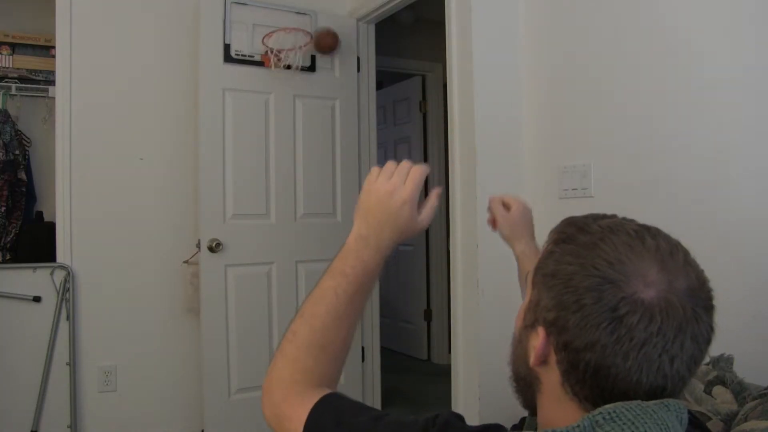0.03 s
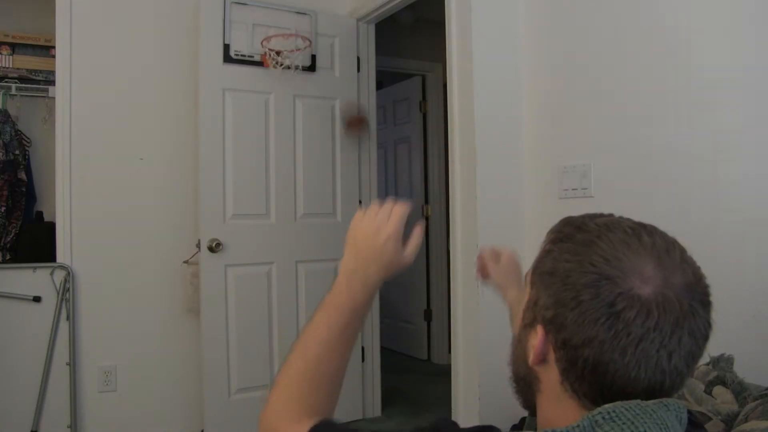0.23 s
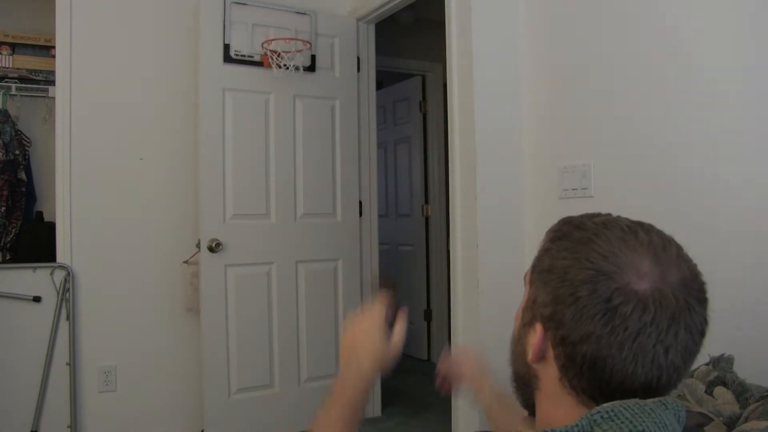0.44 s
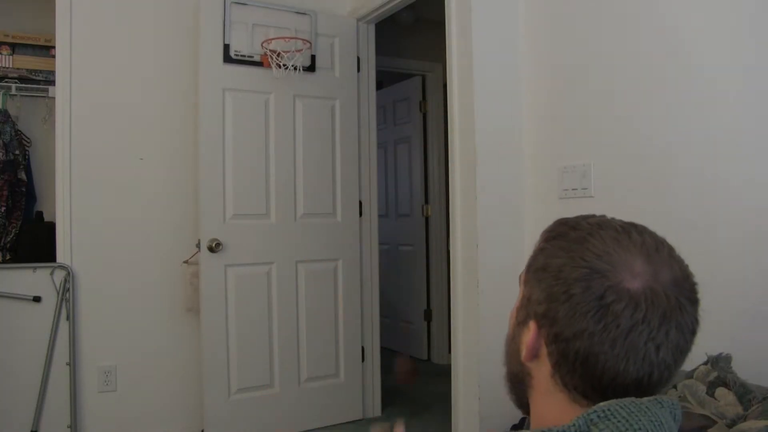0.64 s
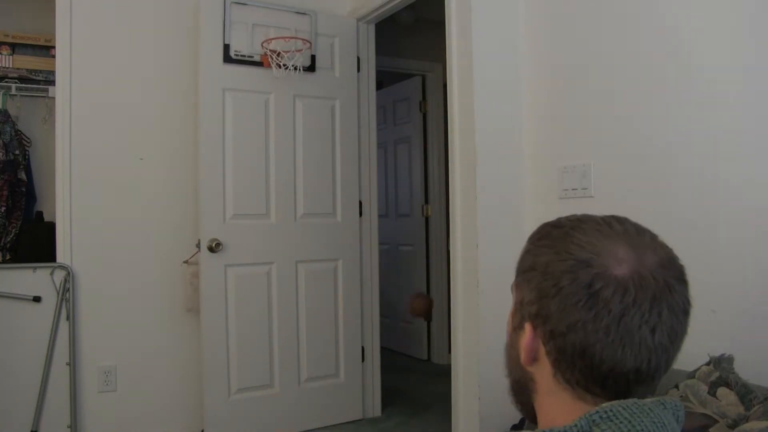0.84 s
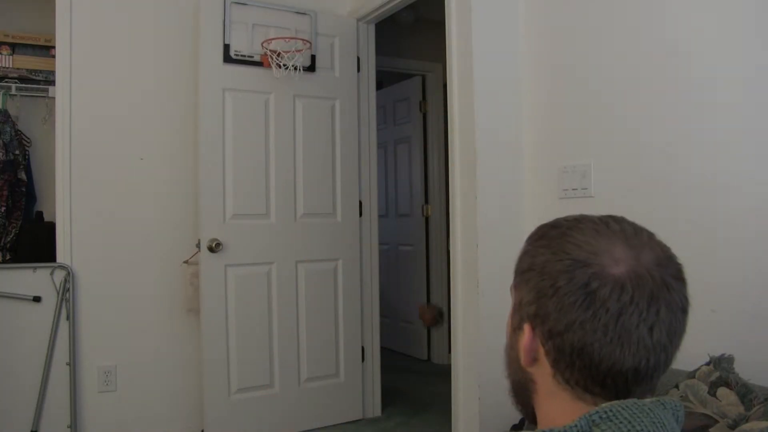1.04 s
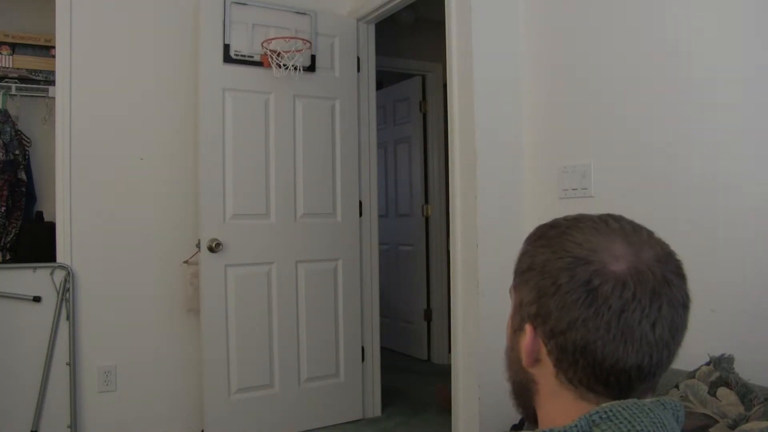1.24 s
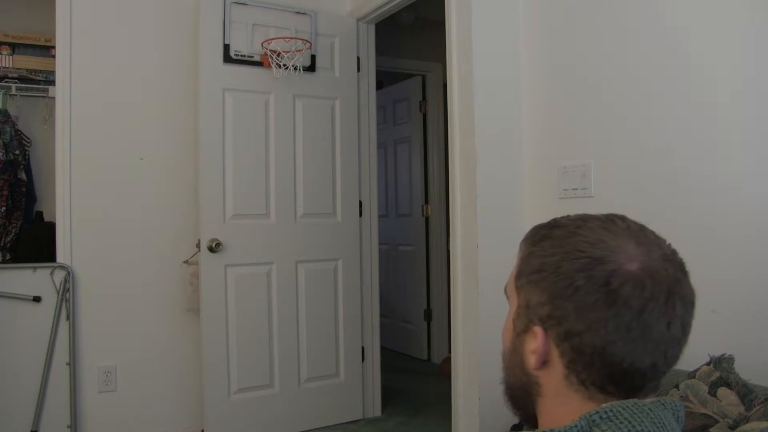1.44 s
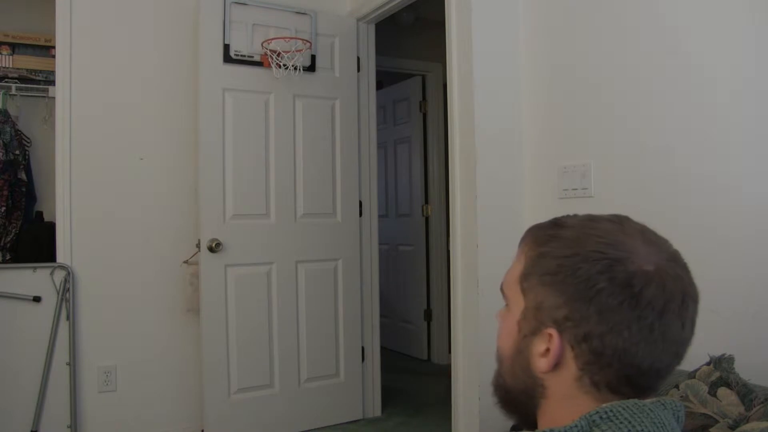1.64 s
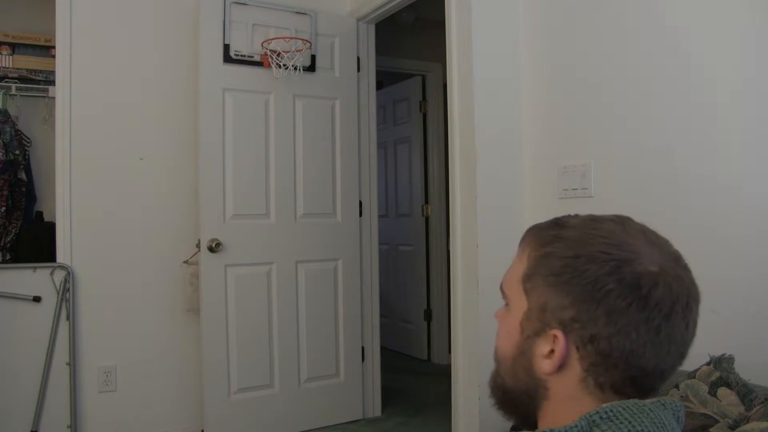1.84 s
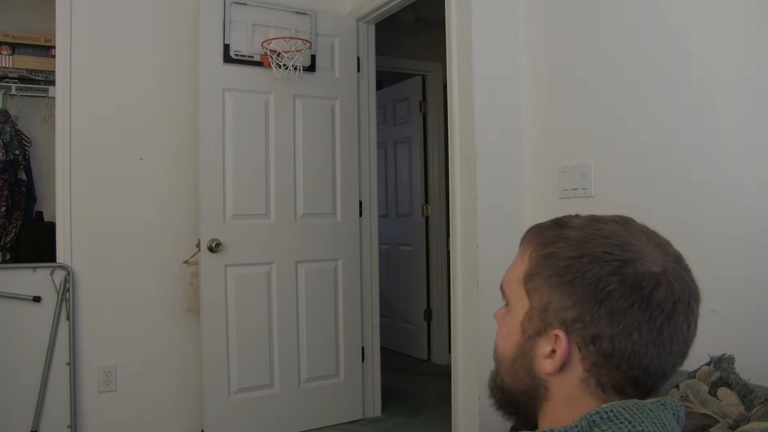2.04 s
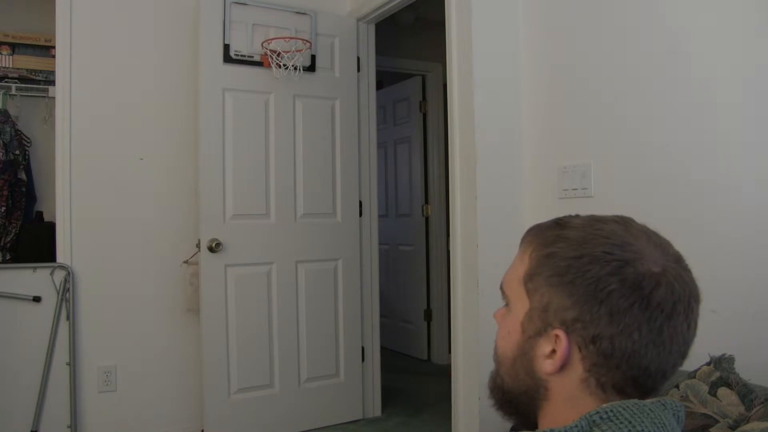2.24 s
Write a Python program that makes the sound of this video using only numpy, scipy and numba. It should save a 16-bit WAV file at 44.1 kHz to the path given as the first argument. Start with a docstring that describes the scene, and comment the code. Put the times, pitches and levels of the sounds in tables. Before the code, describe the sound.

Loud plastic clatter of a toy hoop and door opens at once and dies quickly, followed by a hollow knock, two weakening floor thumps and a slight clothing rustle, picked up in stereo in a small room with low hiss and hum.

```python
"""A plastic backboard hung over a hollow door is struck by a small ball: modal resonators under short blows.
Board and hoop rattle as random clicks, the board slaps the door (modal) and its hooks squeak (harmonic partials).
The ball then knocks a hollow panel and bounces on a carpeted floor, softer each time, both modal with noise scuffs.
Shaped noise gives rustling clothes and microphone hiss, sines the mains hum; all-pass filters and a feedback
delay network give the small furnished room."""
import sys
import numpy as np
from scipy import signal
from scipy.fft import rfft, irfft, next_fast_len
from scipy.io import wavfile
from scipy.ndimage import uniform_filter1d
from numba import njit

SR = 44100
rng = np.random.default_rng(int(sys.argv[2]) if len(sys.argv) > 2 else 0)


def persist_wave(psi):
    """Save psi, clipped to +-1, as 16-bit WAV."""
    counts = np.round(np.clip(psi, -1, 1) * 32767).astype(np.int16)
    wavfile.write(sys.argv[1], SR, np.atleast_2d(counts).T)


N = 100239

LEAD = int(.05 * SR)  # samples computed before time 0 and then dropped; negative times fall here
M = N + LEAD
T = np.arange(M) / SR - .05  # s
TOP_HZ = 15900  # upper band limit


def undb(db):
    """Decibel definition: amplitude ratio from a level."""
    return 10 ** (np.asarray(db) / 20)


def colour(x, table):
    """Linear filtering: weight the spectrum by (frequency [Hz], gain [dB]) on a log-frequency axis."""
    n = next_fast_len(len(x) + LEAD)
    f = np.maximum(np.arange(n // 2 + 1) * SR / n, 1)
    hz, db = np.array(table, float).T
    gain = undb(np.interp(np.log(f), np.log(hz), db))
    return irfft(rfft(x, n) * gain, n)[:len(x)]


def hiss(table):
    """Random noise: a white spectrum coloured by the table and scaled to rms 1."""
    x = colour(rng.standard_normal(M), table)
    return x / x.std()


def curve(table):
    """Amplitude envelope: levels (time [s], level [dB]) joined by straight lines in dB."""
    return undb(np.interp(T, *np.array(table, float).T))


def swell(start_s, length_s):
    """Amplitude envelope: one half-sine arch."""
    return np.sin(np.pi * np.clip((T - start_s) / length_s, 0, 1))


def bursts(rows, decay_s):
    """Exponential relaxation: bursts (time [s], level [dB]) rise fast and die away."""
    rise_s = .001
    total = 0
    for start_s, db in rows:
        age = np.maximum(T - start_s, 0)
        total = total + undb(db) * (1 - np.exp(-age / rise_s)) * np.exp(-age / decay_s)
    return total


def bell(hz, centre_hz, octaves):
    """Resonance weighting: a bell on the log-frequency axis, 6 dB down at the given octaves from its centre."""
    return undb(-6 * (np.log2(hz / centre_hz) / octaves) ** 2)


def push(start_s, db, contact_ms):
    """Impulse of a contact force: a softer contact gives a longer, lower push of equal area."""
    pulse = np.sin(np.pi * np.clip((T - start_s) / (contact_ms / 1000), 0, 1)) ** 2
    return undb(db) / (contact_ms * SR / 2000) * pulse


def ring(blows, modes, octaves, shake=0):
    """Modal superposition: each blow wakes the modes around its own centre; a shake drives them all."""
    hz, db, t60 = np.array(modes, float).T
    pushes = np.array([push(*blow[:3]) for blow in blows])
    weights = bell(hz[:, None], np.array(blows)[:, 3], octaves)
    forces = weights @ pushes + shake
    poles = np.exp(2j * np.pi * hz / SR - np.log(1000) / (t60 * SR))
    total = 0
    for k, pole in enumerate(poles):
        sign = (-1) ** k  # neighbouring modes swing in opposition
        total = total + sign * undb(db[k]) * signal.lfilter([1], [1, -pole], forces[k]).imag
    return total


# spectrum of air and microphone hiss: (frequency [Hz], relative level [dB per Hz])
AIR = [(25, -38), (50, -13.5), (85, -4.5), (160, -1), (250, -3), (430, 0), (800, -7), (1500, -10),
       (3000, -13.5), (8000, -19.5), (16000, -26)]
# stereo spread of that hiss: (frequency [Hz], side over mid [dB])
AIR_WIDTH = [(60, -16), (110, -14), (200, 0.5), (380, -3), (700, 0.5), (1290, -2.5), (2380, -5), (4400, -5),
             (8120, -7.5), (15000, -5)]
# mains hum before its waver: (frequency [Hz], level [dB rms])
HUM = [(59, -73.5), (120, -62)]


def background():
    """Stationary noise and tones: air and microphone hiss as mid and side; mains hum wavers a little in the mid."""
    air_db = -58.5
    waver = 1 + 8.74 * uniform_filter1d(rng.standard_normal(M), size=3000)
    hum = 0
    for hz, db in HUM:
        hum = hum + undb(db) * np.sqrt(2) * np.sin(2 * np.pi * hz * T)
    mid = undb(air_db) * hiss(AIR) + hum * waver
    side = undb(air_db) * colour(hiss(AIR), AIR_WIDTH)
    return mid, side


# modes of the plastic board: (frequency [Hz], relative level [dB], t60 [s])
BOARD_MODES = [(577, -9.5, .1), (621, -2.5, 0.085), (650, -3.5, 0.07), (837.2, 1, 0.073), (1005, -2, 0.042),
               (1049, 1, 0.042), (1254, -7.5, 0.11), (1417, -7.5, 0.051), (1558, -7, 0.046),
               (1697, -8, 0.032), (1785, -10, .05), (2216, -9.5, 0.029), (3996, -10.5, 0.049),
               (5400, -12, 0.041)]
# blows on the board:
# (time [s], relative level [dB], contact [ms], centre of woken modes [Hz], relative crack level [dB])
BOARD_BLOWS = [(-.02, -19, 0.24, 1410, 3.5), (.006, -39, 0.2, 1000, -12.5), (0.022, -11, 0.34, 1370, -18.5),
               (.038, -13, 0.69, 627, -27), (0.082, -21.5, 0.37, 1490, -28), (.118, -26, 0.69, 900, -28),
               (.143, -7.5, 0.81, 950, -41), (.218, -14, 0.68, 720, -58), (0.251, -26, 0.095, 2180, -26),
               (.261, -46, 0.37, 1580, -21.5), (.350, -24.5, 0.11, 1460, -32), (.362, -30, 0.15, 1810, -44),
               (0.402, -35, 0.21, 2200, -31.5), (.416, -26.5, 0.47, 780, -49), (.432, -35, 1, 1140, -48),
               (.478, -47, 0.17, 694, -62), (.54, -36, 0.96, 1080, -80)]
# least strength of the rattle clicks: (time [s], relative level [dB])
RATTLE = [(0, -43), (.06, -36.5), (.13, -43), (.2, -45.5), (.26, -56), (.33, -61), (.43, -56), (.52, -66),
          (.65, -94.5), (.7, -130)]
# spectrum of the crack: (frequency [Hz], relative level [dB per Hz])
CRACK = [(200, -25), (500, -12), (1200, -4.5), (2400, -10.5), (3000, -15), (6000, -18), (9000, -20),
         (12000, -27), (16000, -33.5)]


def backboard():
    """Modal excitation by impact: blows and random rattle clicks ring the board, with a noise crack at each."""
    rattles_per_s, spread_db = 1900, 3.5  # clicks exceed the curve by spread_db on average
    crack_decay_s = .0057
    chance = rng.random((3, M))
    excess = undb(-spread_db * np.log(1 - chance[1]))
    clicks = (chance[0] < rattles_per_s / SR) * excess * curve(RATTLE)
    shake = undb(-2) * clicks * np.sign(chance[2] - .5)  # either direction at random
    blow_cracks = bursts([(blow[0], blow[4]) for blow in BOARD_BLOWS], crack_decay_s)
    click_cracks = undb(-7.5) * signal.lfilter([1], [1, -.99], clicks)  # each click dies in a few ms
    crack = hiss(CRACK) * (blow_cracks + click_cracks)
    return ring(BOARD_BLOWS, BOARD_MODES, .64, shake) + crack


# modes of the hollow door: (frequency [Hz], relative level [dB], t60 [s])
DOOR_MODES = [(121.4, -3.5, 0.167), (156, -31, 0.45), (166.7, 2, 0.096), (212.6, -2.5, 0.14),
              (267.4, 0, .1), (328, -3, 0.061), (361.8, 3, 0.083), (438.3, -3, 0.15), (477.5, 6.5, 0.068),
              (653, 4, 0.033), (691, 2.5, 0.28), (769, 9, 0.083), (1047, 27, 0.22)]
# slaps of the board on the door:
# (time [s], relative level [dB], contact [ms], centre of woken modes [Hz])
DOOR_SLAPS = [(-.01, -17.5, 0.81, 278), (.056, -20.5, 0.41, 417), (.1, -17.5, 0.55, 278),
              (.162, -14, 0.4, 246), (.177, -14.5, 1.17, 390), (.205, -18.5, 0.73, 190),
              (.235, -11.5, 1.5, 285), (.258, -17, 2.08, 325), (.282, -21.5, 3.1, 207), (.3, -23, 1.1, 216),
              (.33, -35, 0.45, 400), (.385, -24.5, 1.5, 192), (.415, -28.5, 0.61, 216),
              (.45, -37, 0.95, 463), (.49, -28.5, 1.83, 226), (.515, -41, 2.4, 200), (.585, -50, 1.23, 786)]


def door():
    """Modal excitation by impact: slaps of the board ring the hollow door."""
    return ring(DOOR_SLAPS, DOOR_MODES, .64)


# squeaks of the hooks: (time [s], length [s], pitch [Hz], relative level [dB], loudest region [Hz],
# its half-width to 6 dB down [octaves], roughness before smoothing [0-1])
SQUEAKS = [(0.249, 0.026, 2733, -28.5, 7800, 0.37, .25), (.378, 0.015, 9300, -42.5, 9300, .5, 0.17),
           (0.418, 0.012, 5780, -30.5, 5800, 0.31, 0.3), (0.467, 0.048, 3839, -36.5, 4900, 0.69, 0.03)]


def hooks():
    """Stick-slip friction: short harmonic stacks whose pitch jitters at random."""
    fade_nepers = 3.55  # decay over the length of a squeak
    out = 0
    for start_s, length_s, hz, db, top_hz, octaves, rough in SQUEAKS:
        drift = uniform_filter1d(rng.standard_normal(M), size=40) * rough
        phase = 2 * np.pi * np.cumsum(hz * (1 + drift)) / SR
        stack = 0
        for k in range(1, 6):
            if k * hz < TOP_HZ:
                stack = stack + bell(k * hz, top_hz, octaves) * np.sin(k * phase)
        fade = np.exp(-fade_nepers * np.clip((T - start_s) / length_s, 0, 1))
        out = out + undb(db) * swell(start_s, length_s) * fade * 2 * stack
    return out


# spectrum of the scuffing ball skin: (frequency [Hz], relative level [dB per Hz])
SCUFF = [(300, 5), (1500, 16.5), (3000, -4), (8000, -11.5), (16000, -11)]


def scuffs(hits):
    """Friction noise: the skin of the ball scuffs at each hit and dies away exponentially."""
    return hiss(SCUFF) * bursts([(hit[0], hit[4]) for hit in hits], .0055)


# modes of the hollow panel: (frequency [Hz], relative level [dB], t60 [s])
PANEL_MODES = [(167, -12.5, 0.42), (250, 0.5, 0.052), (282, -14, 0.11), (343.4, -1.5, 0.21),
               (388, -4, 0.11), (419.4, 9, 0.034), (691, -14, 0.11), (744.5, -11, 0.32), (804, -8.5, 0.33),
               (824, -0.5, 0.031), (1020, -19, 0.044), (1248, -4.5, 0.021), (1890, -20, 0.0076),
               (2420, -7.5, 0.021)]
# knocks of the falling ball:
# (time [s], relative level [dB], contact [ms], centre of woken modes [Hz], relative scuff level [dB])
PANEL_KNOCKS = [(0.663, -24.5, 0.9, 760, -33.5), (.6735, -15, 0.44, 553, -28),
                (.689, -24, 0.95, 380, -42.5)]


def panel():
    """Modal excitation by impact: the falling ball knocks a hollow panel and scuffs it."""
    return ring(PANEL_KNOCKS, PANEL_MODES, 2.3) + scuffs(PANEL_KNOCKS)


# spectrum of the swish: (frequency [Hz], relative level [dB per Hz])
SWISH = [(3000, -24), (8000, -4), (12000, -3), (16000, -10)]
# spectrum of the rustle: (frequency [Hz], relative level [dB per Hz])
RUSTLE = [(300, -2), (800, -0.5), (2500, 2), (6000, -6.5), (16000, -19)]
# growth of the rustle: (time [s], relative level [dB])
RUSTLE_LEVEL = [(0, -93), (1.95, -89), (2.08, -62.5), (2.27, -57.5)]


def clothes():
    """Amplitude-modulated friction noise: a brief bright swish, later a growing rustle."""
    swish = undb(-61.5) * swell(.915, .052) * hiss(SWISH)
    return swish + hiss(RUSTLE) * curve(RUSTLE_LEVEL)


# modes of the carpeted floor: (frequency [Hz], relative level [dB], t60 [s])
FLOOR_MODES = [(148, -3, 0.11), (178, -8.5, 0.23), (226, 1, 0.1), (332, -5, 0.14), (389, 2, 0.04),
               (472, 5.5, 0.045), (578.5, -12.5, 0.16), (690, -10, 0.11), (790, -13, 0.067),
               (860, -15, .07), (1040, -8, 0.075), (1700, -23, .04), (2300, -22, 0.055)]
# bounces of the ball:
# (time [s], relative level [dB], contact [ms], centre of woken modes [Hz], relative scuff level [dB])
FLOOR_BOUNCES = [(1.346, -32.5, 1.33, 298, -55), (1.352, -38.5, 0.35, 595, -43.5),
                 (1.721, -48.5, 2.05, 250, -62)]


def floor():
    """Modal excitation by impact: the ball thumps the carpeted floor and scuffs it."""
    return ring(FLOOR_BOUNCES, FLOOR_MODES, 2.3) + scuffs(FLOOR_BOUNCES)


# delays of the scattering furniture: (delay [ms])
SCATTER_MS = [1.7, 3.1, 5.3]


def scatter(x):
    """All-pass diffusion: furniture spreads every click over a few milliseconds."""
    for ms in SCATTER_MS:
        taps = np.r_[-.6, np.zeros(int(ms * SR / 1000)), 1]
        x = signal.lfilter(taps, taps[::-1], x)
    return x


@njit
def walls(x, lags, gain, damp):
    """Feedback delay network: eight delays feed each other, duller every round; two unlike sums come out."""
    line, soft, out = np.zeros((8, 4096)), np.zeros(8), np.zeros((2, len(x)))
    for i in range(len(x)):
        total = 0.
        for k in range(8):
            soft[k] += (1 - damp) * (gain[k] * line[k, (i - lags[k]) & 4095] - soft[k])
            total += soft[k]
            out[k % 2, i] += soft[k] * (1 - (k & 2))
        for k in range(8):
            line[k, i & 4095] = x[i] + soft[k] - total / 4  # lossless mixing (Householder reflection)
    return out


# delays between the walls: (delay [ms])
WALLS_MS = [13.1, 19.7, 25.3, 31.9, 39.7, 47.3, 56.9, 67.1]
# stereo spread of the reverberation before its overall side gain: (frequency [Hz], side gain [dB])
WIDTH = [(60, -38), (110, -29.5), (200, -27.5), (380, -22.5), (700, -13), (1290, -16.5), (2380, -13),
         (4400, -9.5), (8120, -16.5), (15000, -31)]


def reverberation(early):
    """Exponential decay of a diffuse field: the walls return the scattered sound as mid and side."""
    t60_s, damp = .33, .23  # decay time before the damping shortens the treble
    ms = np.array(WALLS_MS)
    gain = undb(-60 * ms / 1000 / t60_s)
    lags = (ms * SR / 1000).astype(np.int64)
    far = walls(early + 1e-18, lags, gain, damp)  # the tiny offset avoids slow denormal numbers
    return undb(-7) * far[0], undb(6.5) * colour(far[1], WIDTH)


def scene():
    """Superposition: direct, scattered and reverberant sound over the background, as left and right."""
    near = backboard() + door() + hooks() + panel() + clothes() + floor()
    # small sources radiate little bass below 100 Hz
    near = signal.sosfilt(signal.butter(3, 100, "high", fs=SR, output="sos"), near)
    early = scatter(near)
    far_mid, far_side = reverberation(early)
    air_mid, air_side = background()
    mid = undb(2) * near + undb(-4) * early + far_mid + air_mid
    side = far_side + air_side
    return np.array([mid + side, mid - side])[:, LEAD:]


def record(dry):
    """Band limiting: a steep elliptic low-pass cuts the top."""
    return signal.sosfilt(signal.ellip(10, .2, 70, TOP_HZ, fs=SR, output="sos"), dry)


dry = scene()
out = record(dry)
persist_wave(out)
```